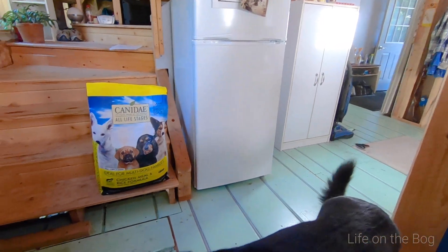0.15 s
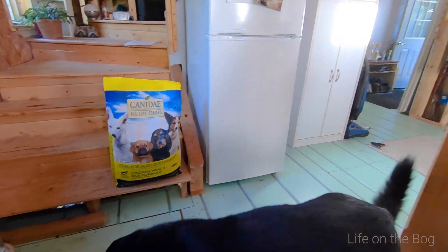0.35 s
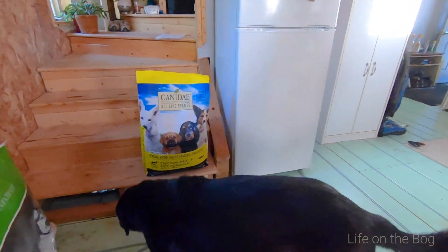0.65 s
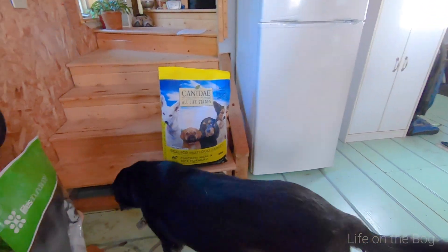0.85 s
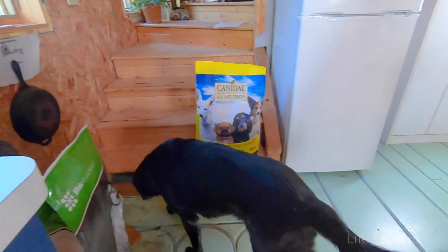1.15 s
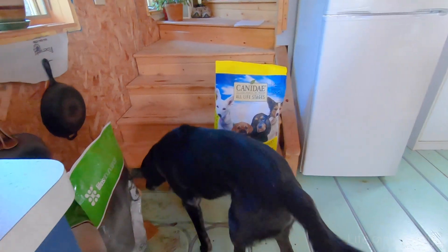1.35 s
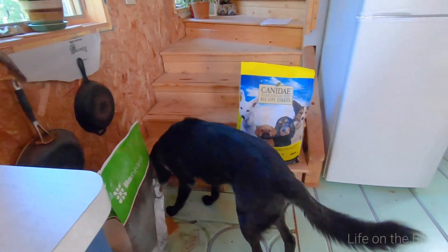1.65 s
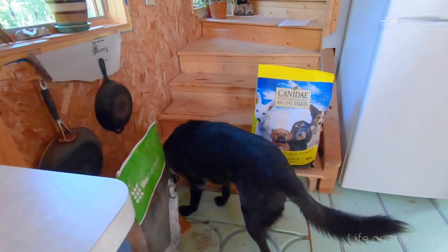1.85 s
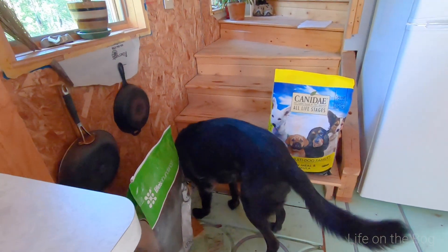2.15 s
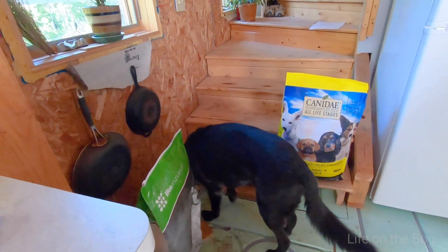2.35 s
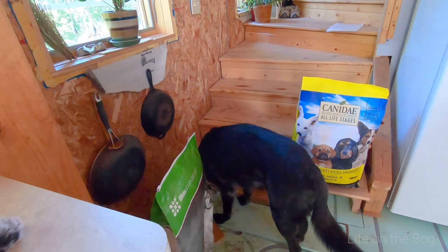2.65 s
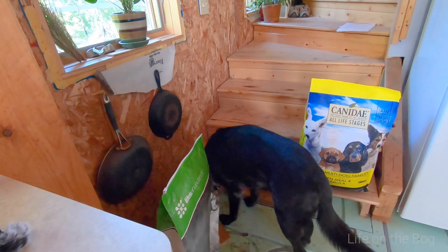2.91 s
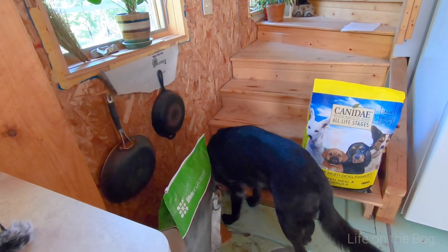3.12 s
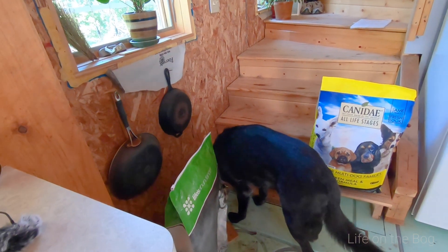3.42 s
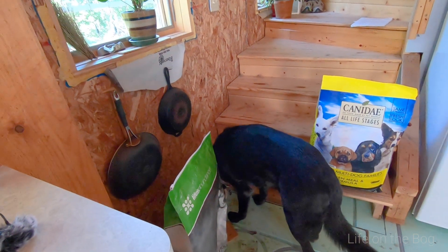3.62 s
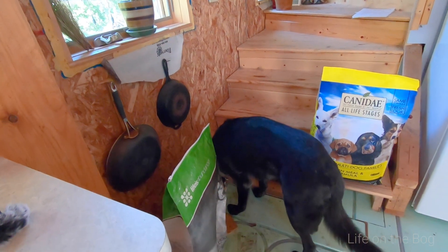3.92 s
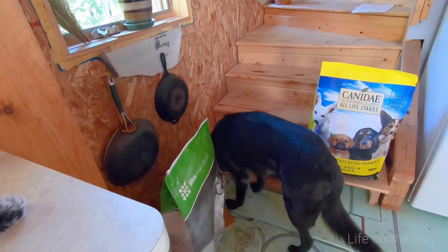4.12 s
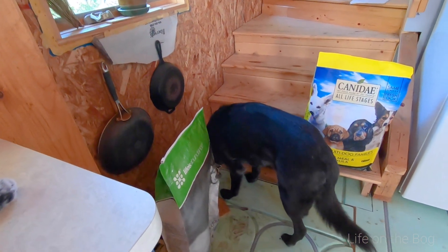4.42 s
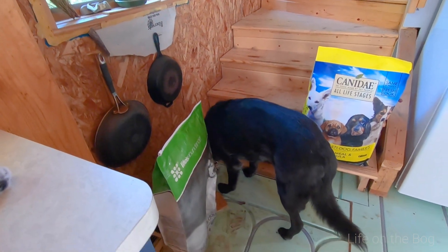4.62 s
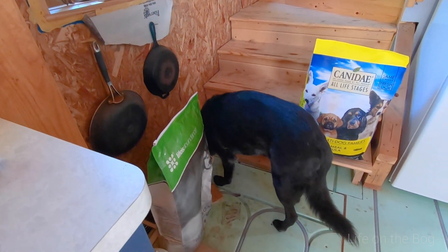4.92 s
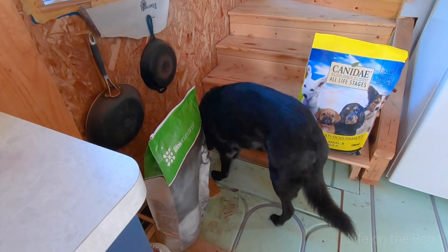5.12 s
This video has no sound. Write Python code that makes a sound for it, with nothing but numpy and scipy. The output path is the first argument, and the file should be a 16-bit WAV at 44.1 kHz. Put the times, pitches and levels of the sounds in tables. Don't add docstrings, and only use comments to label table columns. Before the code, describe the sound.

Light, irregular claw ticks and slips on painted boards come first, with dull paw thuds, a low plank hum and a faint pan ring. Then a sharp burst of clacks starts the feeding: the snout stirs dry kibble, pieces bump the bowl and crunch between teeth. Short indoor echoes, quiet appliance hum, handheld camera microphone nearby.

```python
import sys
import numpy as np
from scipy import signal
from scipy.fft import rfft, irfft, next_fast_len
from scipy.io import wavfile
from scipy.ndimage import uniform_filter1d

SR = 44100
rng = np.random.default_rng(int(sys.argv[2]) if len(sys.argv) > 2 else 0)


def undo_db(level):
    steps = np.asarray(level, float) / 20
    return 10 ** steps


def int16_out(signal):
    q = np.round(np.clip(np.atleast_2d(signal).T, -1, 1) * 32767)
    wavfile.write(sys.argv[1], SR, q.astype(np.int16))


N = 232142

# f/Hz, density/dB
DRONE_COLOUR = [(15, -37), (25, -10.5), (105, -24), (149, -4), (203, 0), (463, -19.5), (737, -5.5),
                (1030, -18), (1270, -12.5), (2970, -13.5), (6620, -24), (10300, -44), (12000, -62),
                (15600, -91), (22000, -120)]
DRONE_DB = -58
# t/s, level/dB
PLANK_HUM = [
    (0.0, -72),
    (0.56, -60.5),
    (0.91, -64.5),
    (1.11, -71.5),
    (1.35, -53.5),
    (1.5, -68.5),
    (2.0, -70),
    (2.5, -71),
    (5.26, -71.5),
]
# f/Hz, t60/s, level/dB
CABIN = [(300, 0.42, 2), (720, 0.28, 5), (1460, 0.36, 2), (3100, 0.48, -3), (6520, 0.4, -0.5),
         (11900, 0.38, -1)]
PLACES, PLACE_S = 3, 0.13
ECHO_CLUMP_DB, ECHO_CLUMP_S, TAIL_RISE_S = 2.5, 0.004, 0.0058
NEAR_ECHO_S = 0.007
# f/Hz, likeness/1
LIKENESS = [(30, 0.096), (150, 0.25), (300, 0.05), (600, 1), (1200, 0.1), (2400, 0.61), (5000, 0.34),
            (10000, 0.24)]
# f/Hz, left lead/rad
PORT_PHASE = [(200, 0), (520, -.9), (860, -1.6), (1290, .08), (3000, -.06), (4500, .8), (7000, -1.1),
              (10000, -1.4)]
# f/Hz, left over right/dB
PORT_BALANCE = [(60, 0), (110, -1.5), (200, 0.5), (380, 2), (700, -3.5), (1290, -1.0), (2380, -0.5),
                (4400, -1.0), (8120, -1), (15000, 5)]

# t/s, peak level/dB, plank f/Hz, boom level/dB
THUDS = [(0.334, -43, 180, -15.5), (0.398, -52, 210, -18), (0.694, -41.5, 182, -13.5),
         (0.78, -36.5, 161, -17.5), (0.849, -50.5, 189, -24), (1.081, -46, 187, -12.5),
         (1.198, -53.5, 274, -12), (1.335, -53, 168, -18), (1.479, -53, 171, -12.5), (1.679, -49, 225, -34),
         (2.283, -55, 225, -4), (2.511, -48.5, 149, -23), (3.004, -51.5, 252, -38),
         (3.533, -42.5, 199, -47), (3.777, -60, 215, -34), (3.93, -55, 212, -36), (4.977, -51, 262, -16),
         (0.061, -72, 190, -9), (0.61, -61, 190, -13.5), (1.76, -63, 297, -8.5), (2.0, -64.5, 325, -18),
         (0.629, -50, 186, -33), (0.901, -50, 189, -30)]
PLANK_T60_S = 0.3
# t/s, level/dB, f/Hz, t60/s
PAN_RING = [
    (1.24, -53.5, 1423, 0.46),
    (1.333, -61, 1357, 0.28),
]
# t/s, level/dB
SCUFF = [(0.0, -38.5), (0.19, -86), (0.37, -42.5), (0.48, -43), (0.54, -50), (.66, -62), (1.34, -43),
         (1.47, -43.5), (1.64, -74), (1.8, -49.5), (1.95, -61), (1.97, -41.5), (2.14, -62), (2.27, -70),
         (2.33, -43.5), (2.42, -56), (2.6, -44)]
# f/Hz, density/dB
SCUFF_COLOUR = [(240, -68), (400, -9.5), (1070, -3), (1540, 0.5), (3450, -4.5), (6710, -6.5), (9960, -15),
                (15000, -52)]

# t/s, peak level/dB, ring f/Hz, treble level/dB
SLIDES = [(0.012, -34.5, 1950, -2), (0.171, -38, 2050, -34), (0.454, -39.5, 1900, -4),
          (.495, -44, 3050, -16), (.546, -50, 2440, -5), (0.699, -41, 5960, -4), (0.912, -33.5, 2700, -17),
          (1.399, -48, 2600, 8), (1.458, -38.5, 2760, -3), (1.663, -43.5, 3100, -18),
          (2.196, -51.5, 2620, -15), (.027, -31, 2600, -8), (0.185, -47.5, 2670, -11)]
SLIDE_LOW_DB, SLIDE_SWELL_S = -16, 0.0088
# t/s, peak level/dB, ring f/Hz, treble level/dB
TIPS = [(0.039, -36, 1900, -1), (0.0634, -35, 9200, -20), (0.7165, -38, 2940, 9),
        (0.7756, -29.5, 2960, 14.5), (0.92, -37, 3560, -9), (1.245, -46, 3260, 4), (1.484, -40.5, 2500, 3),
        (2.008, -38, 3120, 6), (2.2879, -36, 2600, 15), (3.442, -33, 2550, 5.5), (4.8708, -37.5, 3240, -1),
        (0.499, -42, 3000, -9), (.554, -45, 4960, -6), (0.5609, -42, 5700, -12), (.82, -40, 4800, -6),
        (1.468, -41.5, 3390, 1), (1.413, -52, 4000, 0), (1.725, -39.5, 3000, 3), (0.172, -48, 3500, 5),
        (.032, -40, 4500, -1), (.405, -49.5, 2500, -11)]
# t/s, peak level/dB, ring f/Hz, treble level/dB
TOES = [(0.183, -43, 3030, 3.5), (0.35, -38, 2830, 3), (0.391, -47, 3330, 11), (0.505, -32.5, 2850, -3),
        (0.5595, -38, 4560, -12), (0.751, -40, 3170, -5), (0.791, -29.5, 3900, -7), (1.102, -26, 2820, 5),
        (1.2094, -29, 2670, 10), (1.217, -37, 3300, 8.5), (1.69, -31.5, 3080, 0.5), (1.975, -38, 2850, 2),
        (2.294, -37.5, 2600, 18.5), (2.498, -39, 4300, 1), (2.514, -37.5, 5170, 8), (3.38, -41, 4850, -16),
        (4.9702, -37, 4730, 2.5), (5.007, -41, 4500, 4)]
# t/s, peak level/dB
PAD_TAPS = [
    (1.339, -58),
    (1.564, -64),
    (1.617, -69),
    (2.437, -63),
]
TIP_LOW_DB, TOE_LOW_DB, CLAW_PATTER_S = -24.5, -7.5, 0.003
PAD_HZ, PAD_TREBLE_DB, PAD_LOW_DB = 1550, -6, 13.5
# t/s, level/dB, f/Hz, t60/s
CLAW_RINGS = [(0.04, -35.5, 1560, 0.049), (0.041, -38, 1870, 0.054), (0.036, -43, 3280, 0.12),
              (.0625, -33.5, 8900, .03), (.351, -58, 3180, .05), (.504, -41, 2920, 0.077),
              (.504, -52, 3730, .05), (.5595, -46, 1630, 0.046), (.7165, -50, 1680, 0.13),
              (.7165, -48, 3890, 0.056), (.7165, -45, 4635, .05), (.7755, -38, 1400, 0.072),
              (.7755, -49, 3170, .05), (.7755, -41, 4430, .05), (.7755, -40, 5100, 0.052),
              (.7755, -41, 6140, 0.044), (.92, -47, 3550, 0.037), (.92, -47, 4050, 0.057),
              (1.102, -39.5, 2540, 0.16), (1.102, -45, 3160, 0.11), (1.102, -34, 4820, 0.04),
              (1.2093, -45, 1195, 0.14), (1.2093, -36.5, 2265, 0.074), (1.211, -41, 3400, 0.084),
              (1.2093, -41, 4600, .05), (1.69, -47, 1850, 0.13), (1.69, -51, 2700, 0.036),
              (1.69, -35, 6520, 0.047), (1.9745, -52, 1910, .06), (2.202, -53, 2130, 0.081),
              (2.199, -52, 2600, 0.078), (2.204, -58, 3750, .05), (2.2875, -42, 2524, 0.1),
              (2.2875, -47, 3100, 0.072), (2.295, -51, 618, 0.1), (.79, -60.5, 636, 0.38),
              (2.29, -45, 5950, 0.03), (2.29, -44, 6800, .04), (3.442, -50, 3220, 0.071),
              (4.8714, -47, 3420, 0.035), (1.69, -51, 713, 0.082), (.0184, -45.5, 1844, 0.094)]

# f/Hz, width/Hz, level/dB
BOWL = [(795, 19.5, 4), (1332, 410, -4.5), (2092, 274, 2), (2670, 580, -2)]
# t/s, level/dB
DIGS = [(2.56, -45.5), (2.78, -51), (2.95, -43), (3.02, -46.5), (3.1, -58), (3.26, -48.5), (3.371, -38),
        (3.47, -53), (3.59, -41.5), (3.739, -43), (3.95, -47.5), (4.12, -53), (4.249, -44.5), (4.402, -42),
        (4.64, -41.5), (4.81, -45.5), (4.975, -50), (5.1, -45)]
DIG_RISE_DB_PER_S, DIG_FALL_DB_PER_S = 315, 157
# f/Hz, density/dB
STIR_COLOUR = [(180, -36), (300, -20), (775, -5.5), (910, -2), (1320, 1.5), (1700, -2), (2760, -12),
               (5080, -12), (14000, -33)]
# t/s, peak level/dB, ring f/Hz, swell/s
SHOVES = [(2.722, -38, 1200, 0.0086), (2.87, -51.5, 1830, 0.015), (2.922, -43, 2680, 0.014),
          (3.325, -46, 1510, 0.016), (3.352, -33, 1510, 0.013), (3.508, -36, 2960, 0.0099),
          (3.728, -35.5, 1360, 0.0057), (3.882, -41.5, 1490, 0.0061), (4.06, -32, 1350, 0.012),
          (4.1, -40, 1280, 0.0082), (4.3, -44, 2050, 0.012), (4.6, -43.5, 2570, 0.0062),
          (4.635, -47, 1150, 0.0071), (4.785, -39, 1850, 0.0092), (5.07, -40.5, 2450, 0.014),
          (5.125, -41, 1350, 0.014)]
SHOVE_TREBLE_DB, SHOVE_LOW_DB = -17, -10
# t/s, peak level/dB, low knock level/dB
BUMPS = [(2.708, -36, -20.5), (2.77, -37, -10), (2.909, -38.5, -26), (2.967, -36.5, -10), (3.037, -29, -10),
         (3.11, -41, 2.5), (3.191, -39.5, -38), (3.26, -29.5, -9.5), (3.583, -27, -5.5), (3.616, -28, -17),
         (3.898, -41.5, -2), (3.943, -29.5, -6), (3.952, -37, 2), (4.006, -31, -11), (4.029, -29.5, -30),
         (4.2, -40.5, -15)]
BUMP_HZ, BUMP_TREBLE_DB, BUMP_PATTER_S = 1380, -16, 0.0046
# t/s, peak level/dB, ring f/Hz, low knock level/dB
CLACKS = [(2.496, -28.5, 2500, -41), (2.5, -24, 3050, -28), (2.642, -35, 2070, -32),
          (2.946, -36.5, 2340, -12), (3.015, -30, 2560, -14), (3.289, -38.5, 2700, -12),
          (3.344, -36, 3100, -32), (3.57, -30.5, 2670, -22), (3.67, -37.5, 2840, -9),
          (3.693, -36, 2900, -20), (3.75, -35.5, 2160, -3), (4.238, -33.5, 2720, -22),
          (4.25, -31.5, 2050, -14), (4.277, -35, 2680, -10), (4.388, -30, 2020, -38),
          (4.399, -28.5, 2380, -30), (4.44, -36, 2870, -8), (4.572, -39.5, 2480, -28),
          (4.612, -33.5, 2520, -30), (4.638, -37.5, 2400, -18), (4.905, -54, 3150, -23),
          (4.9485, -39, 2200, -35), (4.961, -39, 2530, -28), (5.092, -39, 2600, -5),
          (2.507, -38, 2920, -24), (2.533, -32, 2820, -20), (2.543, -28, 2600, -23),
          (2.561, -28.5, 2900, -34), (3.019, -35.5, 2800, -23), (3.366, -33.5, 2900, -12),
          (3.384, -33, 2400, -1), (4.283, -37.5, 2860, -20), (4.406, -31, 2920, -13),
          (4.563, -46, 2700, -24), (4.789, -39, 2690, -11), (5.012, -37, 2700, -19),
          (5.018, -34.5, 2500, -18), (5.077, -39, 2630, -21)]
CLACK_TREBLE_DB = -22
# t/s, peak level/dB, ring f/Hz, treble level/dB
CRACKS = [(2.513, -23.5, 3180, 1), (2.522, -27.5, 3030, -7), (3.066, -35.5, 3050, -2),
          (3.085, -39, 2370, 6), (3.211, -42.5, 2760, 6), (3.225, -41, 2770, 6), (3.377, -30.5, 2730, 9.5),
          (3.402, -37.5, 2000, -7), (3.489, -42, 2840, 1), (3.522, -36, 2480, 9.5), (4.347, -40, 3100, 1),
          (4.733, -37, 2220, 3.5), (4.847, -41, 2950, -5), (4.971, -25.5, 2680, -0.5),
          (5.005, -34.5, 3350, 7), (5.045, -52, 2500, -4), (5.23, -46, 2690, -10), (3.513, -35.5, 2980, 6),
          (4.604, -39.5, 2740, -9), (2.927, -43.5, 2380, 5), (3.076, -39, 2600, -4)]
CRACK_KNOCK_DB = -54.5
PELLET_PATTER_S, MEAN_PELLET_DB, PATTER_S_PER_DB = 0.0047, -36, 0.00015
# t/s, level/dB, f/Hz, t60/s
BOWL_RINGS = [(2.496, -30.5, 2020, 0.084), (2.4995, -21.5, 2830, 0.038), (2.496, -30, 3420, 0.052),
              (2.497, -40, 4780, 0.055), (2.513, -30, 2080, 0.15), (2.513, -23.5, 2926, 0.079),
              (2.513, -32, 3800, 0.074), (2.513, -47, 4870, 0.048), (2.532, -30, 3020, 0.086),
              (2.507, -31, 3020, 0.085), (2.518, -47.5, 265, 0.22), (2.52, -55, 497, 0.11),
              (2.516, -54, 725, 0.061), (4.975, -52, 473, 0.18), (4.9485, -40, 2720, .04),
              (4.789, -44, 2710, 0.067), (4.613, -39, 2600, 0.058), (3.571, -45, 2670, .04),
              (4.029, -44, 1370, .05), (2.71, -45.5, 790, 0.14), (3.016, -43, 2860, .06),
              (3.26, -39.5, 1330, 0.078), (3.26, -42, 3130, 0.054), (3.377, -46, 2200, 0.053),
              (3.377, -44, 2680, 0.04), (3.377, -32, 5020, 0.062), (3.402, -41, 2960, .05),
              (3.583, -36, 1340, 0.095), (3.583, -39, 1980, 0.041), (3.583, -48, 2820, .05),
              (3.943, -40, 1340, 0.12), (4.007, -44, 2960, .05), (4.238, -50, 2100, .05),
              (4.25, -51, 2080, 0.057), (4.388, -43, 1430, 0.073), (4.388, -43, 3140, .05),
              (4.399, -41, 1300, .08), (4.399, -34, 3380, 0.086), (4.971, -23.5, 2180, 0.068),
              (4.971, -31, 2630, .07), (4.972, -41, 1183, 0.11), (5.005, -37, 2660, .07),
              (5.005, -43, 3400, 0.057), (5.04, -42, 2150, 0.087), (5.075, -41, 2580, 0.091),
              (5.075, -45.5, 1370, 0.094), (5.092, -41, 2640, .06)]

RING_RISE_S, PATTER_RISE_S = 0.00072, 0.00046
FIRST_TICK, CLAW_SHARPNESS = 0.55, 1.4
CLAW_DAMPING, BOWL_DAMPING = 2, 2.37
ROOM_DAMPING = 8.5
CLAW_SPREAD_DB, BOWL_SPREAD_DB = 1, 2


def rms_one(x):
    return x / np.sqrt(np.mean(x ** 2) + 1e-20)


def curve_gain(rows):
    s, db = np.transpose(rows)
    return undo_db(np.interp(np.arange(N) / SR, s, db, left=-140, right=-140))


def at_hz(points, hz, column=1):
    table = np.array(points)
    return np.interp(np.log(hz), np.log(table[:, 0]), table[:, column])


def resonate(x, hz, width):
    r = np.exp(-np.pi * width / SR)
    zeros = np.array([1, 0, -1]) * (1 - r * r) / 2
    poles = [1, -2 * r * np.cos(2 * np.pi * hz / SR), r * r]
    return signal.lfilter(zeros, poles, x)


def butter(hz, kind, order=2):
    return signal.butter(order, hz, kind, fs=SR, output="sos")


def cut(x, hz, kind, order=2):
    return signal.sosfilt(butter(hz, kind, order), x)


def add(out, sound, s):
    i = max(round(s * SR), 0)
    out[:, i:i + sound.shape[1]] += sound[:, :N - i]


def fft_axis(length):
    size = next_fast_len(length, real=True)
    return size, np.maximum(np.arange(size // 2 + 1) * SR / size, 10)


def colour(pair, spectrum):
    length = pair.shape[1]
    size, hz = fft_axis(length)
    mid, side = rfft(pair, size) * undo_db(at_hz(spectrum, hz))
    alike = np.clip(at_hz(LIKENESS, hz), -0.95, 0.95)
    stereo = np.sqrt(1 + alike) * mid + np.sqrt(1 - alike) * side * [[1], [-1]]
    return irfft(stereo, size)[:, :length]


def drone():
    steady = undo_db(DRONE_DB - 6.0) * rms_one(colour(rng.standard_normal((2, N)), DRONE_COLOUR))
    low = colour(rng.standard_normal((2, N)), [(20, 0), (20000, 0)])
    low = resonate(resonate(low, 133, 90), 206, 150)
    low = cut(low, 169, "high", order=6)
    return steady + curve_gain(PLANK_HUM) * undo_db(-1.5) * rms_one(low)


def echo(early_db, late_db, early_s):
    t = np.arange(SR // 2) / SR
    white, tail = rng.standard_normal((2, 2, len(t))), 0
    for k, hz in enumerate(np.geomspace(250, 12000, 12)):
        band = cut(white[k % 2], [hz / 1.19, hz * 1.19], "band")
        tail = tail + band * undo_db(at_hz(CABIN, hz, column=2) - 60 * t / at_hz(CABIN, hz))
    clumps = np.interp(t / ECHO_CLUMP_S, np.arange(500), rng.standard_normal(500))
    tail = tail * undo_db(ECHO_CLUMP_DB * clumps) * (1 - np.exp(-t / TAIL_RISE_S))
    tail = colour(tail, [(20, 0), (20000, 0)])
    hits = rng.random(len(t)) < 4000 / SR
    early = rng.standard_normal((2, len(t))) * hits * np.exp(-t / early_s)
    early = rfft(early[0] + 0.55 * early[1] * [[1], [-1]])
    early = irfft(early / np.sqrt(uniform_filter1d(np.abs(early) ** 2, size=200)), len(t))
    return (undo_db(early_db) * rms_one(early) + undo_db(late_db) * rms_one(tail)) / np.sqrt(len(t))


def cabin(x, early_db, late_db, early_s):
    place = (np.arange(N) / SR // PLACE_S) % PLACES
    out = np.zeros((2, N))
    for k in range(PLACES):
        sent = x[2:] * (place == k)
        out += signal.fftconvolve(sent, echo(early_db, late_db, early_s), axes=1)[:, :N]
    return out


def with_spread(pair):
    return np.vstack([pair, pair.mean(0)])


def pan_ring():
    out, t = np.zeros((2, N)), np.arange(SR // 2) / SR
    for s, db, hz, t60 in PAN_RING:
        noise = rng.standard_normal((3, len(t)))
        stereo = noise[0] + 0.6 * noise[1:]
        ring = rms_one(resonate(resonate(stereo, hz, 72), hz, 120))
        add(out, undo_db(db - 60 * t / t60) * (1 - np.exp(-t / 0.022)) * ring, s)
    return out


def thuds():
    out, t = np.zeros((2, N)), np.arange(16000) / SR
    shape = (1 - np.exp(-t / 0.0099)) * undo_db(-60 * t / PLANK_T60_S)
    for s, db, hz, boom_db in THUDS:
        noise = rng.standard_normal((3, len(t)))
        plank = rms_one(resonate(resonate(noise[0] + 0.49 * noise[1:], hz, 37), hz, 144))
        boom = cut(noise[0] + 0.5 * noise[1:], 90, "low", order=3)
        boom = rms_one(cut(boom, 57, "high", order=3))
        add(out, undo_db(db - 2.5) * shape * (plank + undo_db(boom_db + 9) * boom), s)
    return out


def grains(per_s, spread_db):
    sizes = undo_db(spread_db * np.minimum(rng.exponential(1, N), 4)) * rng.choice([-1, 1], N)
    return sizes * (rng.random(N) < per_s / SR) + 1e-18


def scuff():
    pair = np.array([grains(3000, spread_db=4.5), grains(3000, spread_db=4.5)])
    return curve_gain(SCUFF) * undo_db(-18.0) * rms_one(colour(pair, SCUFF_COLOUR))


def knocks(rows, sharp, low_hz, edge_hz, top_hz, per_s, gain_db, swell=False, body=()):
    out, t = np.zeros((3, N)), np.arange(2400) / SR
    treble = np.vstack([butter(edge_hz, "high"), butter(top_hz, "low")])
    for s, db, hz, treble_db, low_db, length in rows:
        when, size, lean = rng.random((3, len(t)))
        age = t / max(length, 5e-4)
        contacts = (when < per_s / SR) * (2 * size - 1)
        if swell:
            patter = contacts * age * np.exp(-age ** 2 / 2)
            patter[0] = 0
            spread = patter
        else:
            patter = contacts * np.exp(-age) * (1 - np.exp(-t / PATTER_RISE_S))
            patter[0] = FIRST_TICK
            spread = np.sqrt(np.sum(patter ** 2)) * (t == 0)
        sides = patter * (1 + 0.8 * (2 * lean - 1) * [[1], [-1]])
        patter = np.vstack([sides, spread])
        tone = resonate(resonate(patter, hz, hz / sharp), hz, 1.15 * hz)
        for mode_hz, width, level_db in body:
            tone = tone + undo_db(level_db - 0.5) * resonate(patter, mode_hz, width)
        low = resonate(resonate(patter, low_hz, low_hz), low_hz, low_hz)
        tick = signal.sosfilt(treble, patter)
        tone, low, tick = [part / np.abs(part[:2]).max() for part in (tone, low, tick)]
        knock = tone + undo_db(low_db - 3.5) * low + undo_db(treble_db - 3.5) * tick
        add(out, undo_db(db + gain_db) * knock, s)
    return out


def rings(rows, gain_db, spread_db, damping):
    out, t = np.zeros((3, N)), np.arange(4000) / SR
    for s, db, hz, t60 in rows:
        dying_db = np.outer([damping, damping, ROOM_DAMPING], -60 * t / t60) + [[0], [0], [spread_db]]
        tone = (1 - np.exp(-t / RING_RISE_S)) * np.sin(2 * np.pi * hz * t)
        add(out, undo_db(db + gain_db + dying_db) * tone, s)
    return out


def claws():
    rows = [(*row, TIP_LOW_DB, CLAW_PATTER_S) for row in TIPS]
    rows += [(*row, TOE_LOW_DB, CLAW_PATTER_S) for row in TOES]
    rows += [(s, db, PAD_HZ, PAD_TREBLE_DB, PAD_LOW_DB, CLAW_PATTER_S) for s, db in PAD_TAPS]
    struck = knocks(rows, sharp=CLAW_SHARPNESS, low_hz=1400, edge_hz=3900, top_hz=9200,
                    per_s=4400, gain_db=2.0)
    return struck + rings(CLAW_RINGS, gain_db=3.0, spread_db=CLAW_SPREAD_DB, damping=CLAW_DAMPING)


def slides():
    rows = [(*row, SLIDE_LOW_DB, SLIDE_SWELL_S) for row in SLIDES]
    return knocks(rows, sharp=0.77, low_hz=1330, edge_hz=4000, top_hz=8700,
                  per_s=4800, gain_db=-0.5, swell=True)


def digging():
    t = np.arange(0, N + 64, 64) / SR
    gain = np.zeros(len(t))
    for s, db in DIGS:
        gain += undo_db(db - np.maximum(DIG_RISE_DB_PER_S * (s - t), DIG_FALL_DB_PER_S * (t - s)))
    return np.interp(np.arange(N) / SR, t, gain)


def stir():
    pair = np.array([grains(700, spread_db=4.2), grains(700, spread_db=4.2)])
    rung = 0.4 * pair + sum(undo_db(db) * resonate(pair, hz, width) for hz, width, db in BOWL)
    return digging() * undo_db(-9.5) * rms_one(colour(rung, STIR_COLOUR))


def shoves():
    rows = [(s, db, hz, SHOVE_TREBLE_DB, SHOVE_LOW_DB, swell_s) for s, db, hz, swell_s in SHOVES]
    return knocks(rows, sharp=2.1, low_hz=740, edge_hz=1500, top_hz=7900,
                  per_s=2500, gain_db=1.5, swell=True, body=BOWL)


def pellets():
    def patter(db):
        return PELLET_PATTER_S + PATTER_S_PER_DB * (db - MEAN_PELLET_DB)
    rows = [(s, db, BUMP_HZ, BUMP_TREBLE_DB, low, BUMP_PATTER_S) for s, db, low in BUMPS]
    rows += [(s, db, hz, CLACK_TREBLE_DB, low, patter(db)) for s, db, hz, low in CLACKS]
    rows += [(s, db, hz, treble, CRACK_KNOCK_DB - db, patter(db)) for s, db, hz, treble in CRACKS]
    struck = knocks(rows, sharp=2.6, low_hz=750, edge_hz=790, top_hz=8050,
                    per_s=4000, gain_db=-1.0, body=BOWL)
    return struck + rings(BOWL_RINGS, gain_db=2.0, spread_db=BOWL_SPREAD_DB, damping=BOWL_DAMPING)


def scene():
    near = claws() + slides() + with_spread(scuff() + pan_ring())
    bowl = pellets() + shoves() + with_spread(stir())
    corner = np.vstack([cut(bowl[:2], 6800, "low", order=5), cut(bowl[2], 6630, "low")])
    rooms = cabin(near, early_db=0.0, late_db=-0.1, early_s=NEAR_ECHO_S)
    rooms += cabin(corner, early_db=-3, late_db=-2.0, early_s=0.013)
    contacts = cut(near[:2] + corner[:2] + rooms, 7280, "low", order=3)
    return contacts + thuds() + drone()


def top_cut(x):
    return signal.sosfilt(signal.butter(12, 15810, fs=SR, output="sos"), x)


def record(dry):
    size, hz = fft_axis(N)
    half = undo_db(at_hz(PORT_BALANCE, hz) / 2) * np.exp(0.5j * at_hz(PORT_PHASE, hz))
    ports = irfft(rfft(dry, size) * [half, 1 / half], size)[:, :N]
    rounded = 0.3 * np.tanh(ports / 0.3)
    return top_cut(rounded)


dry = scene()
out = record(dry)
int16_out(out)
```